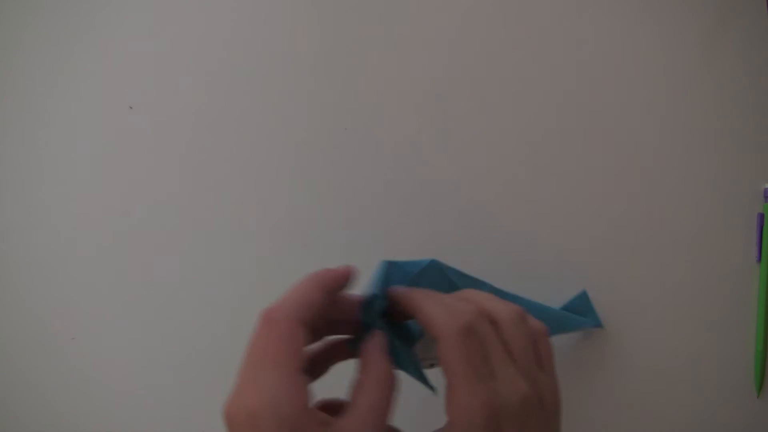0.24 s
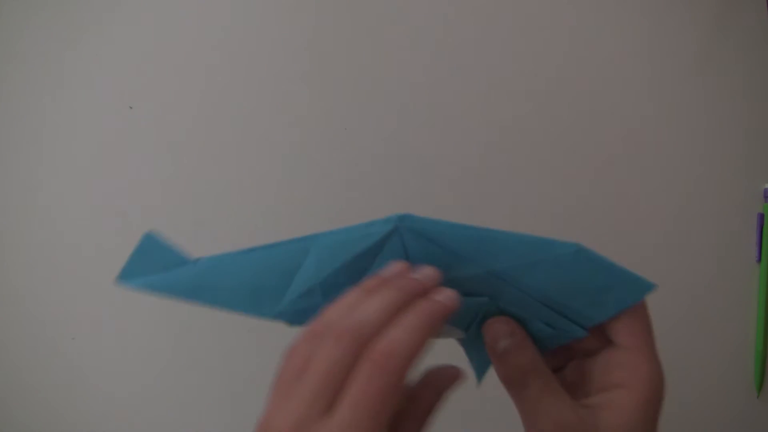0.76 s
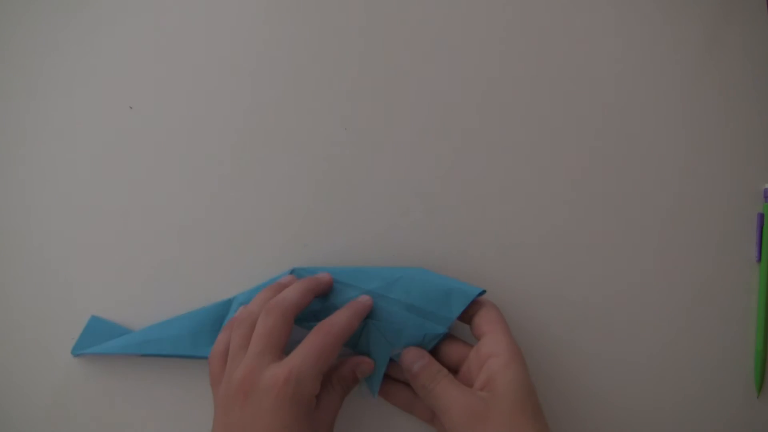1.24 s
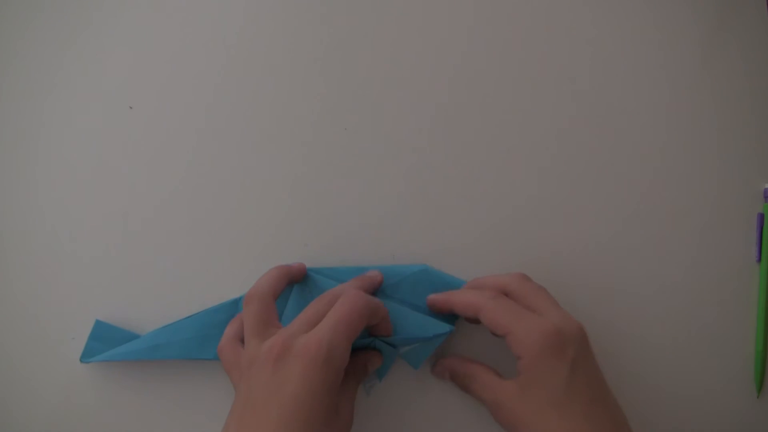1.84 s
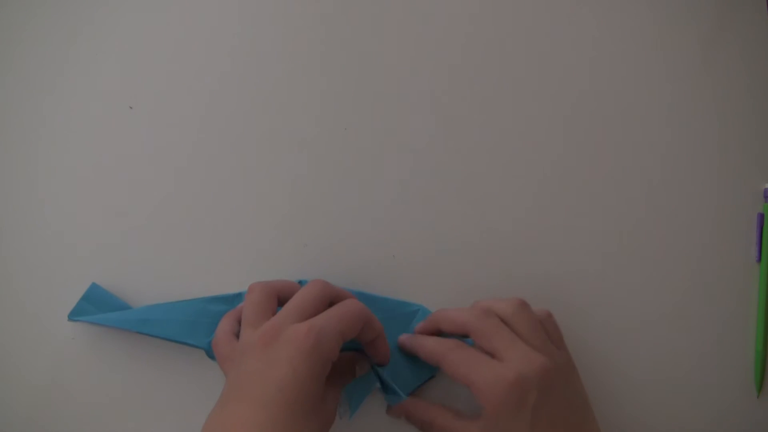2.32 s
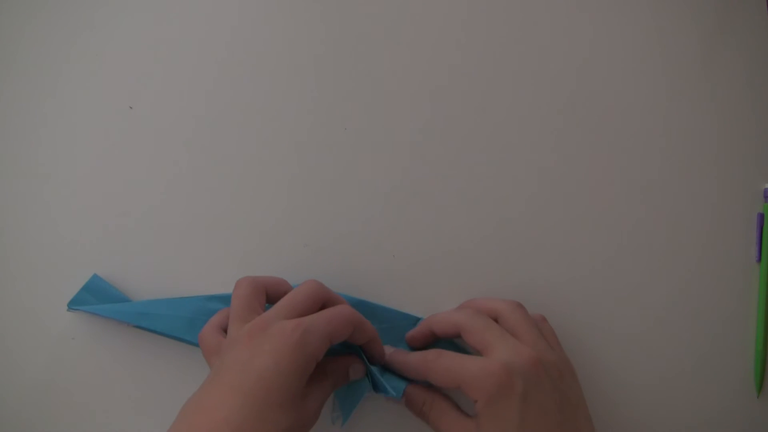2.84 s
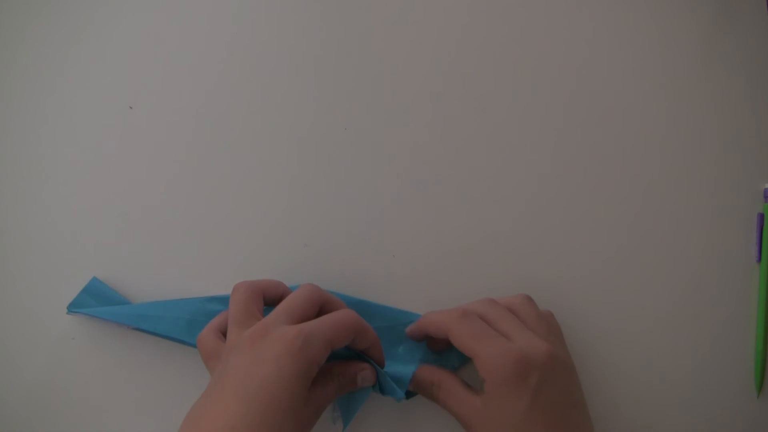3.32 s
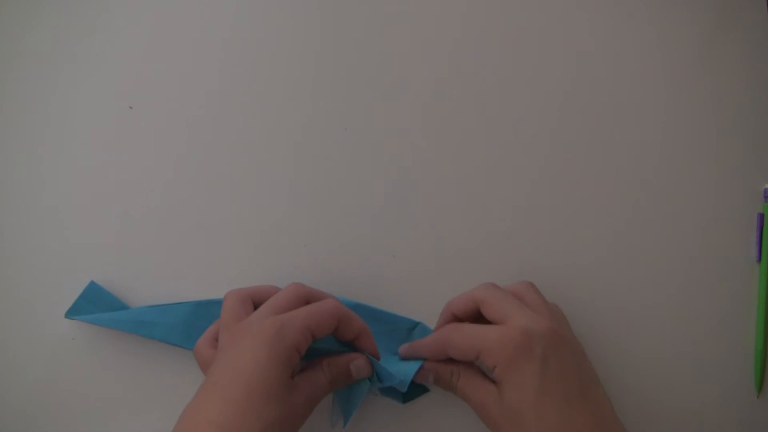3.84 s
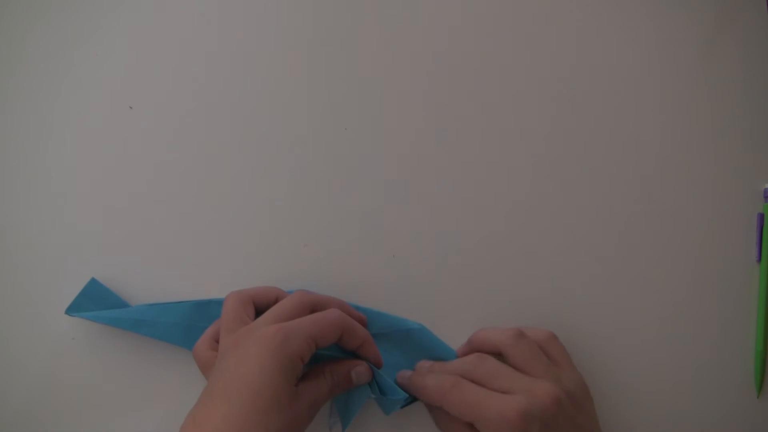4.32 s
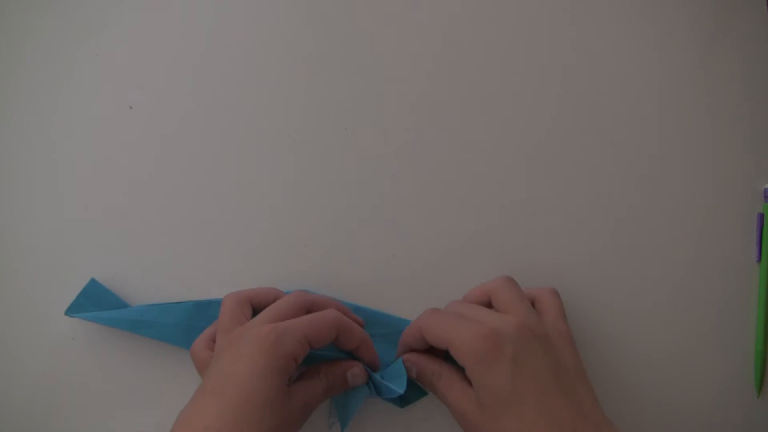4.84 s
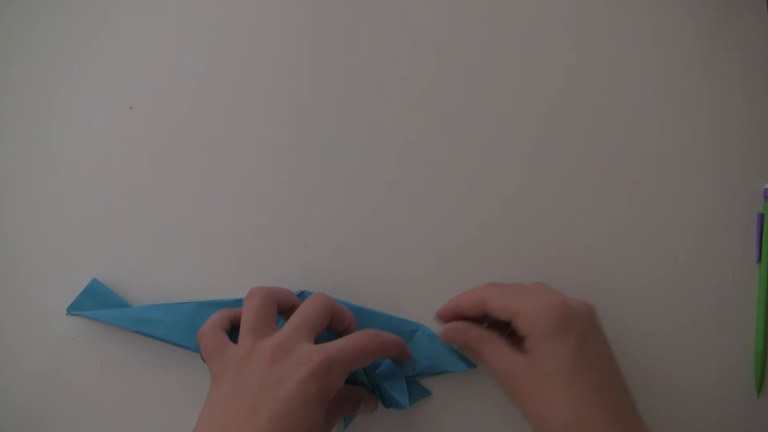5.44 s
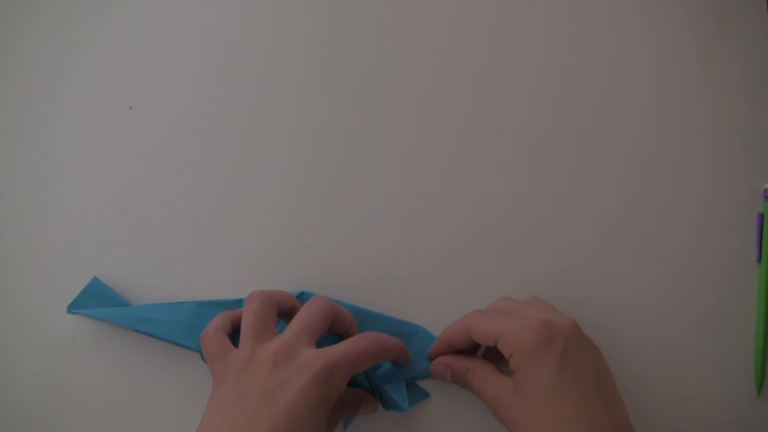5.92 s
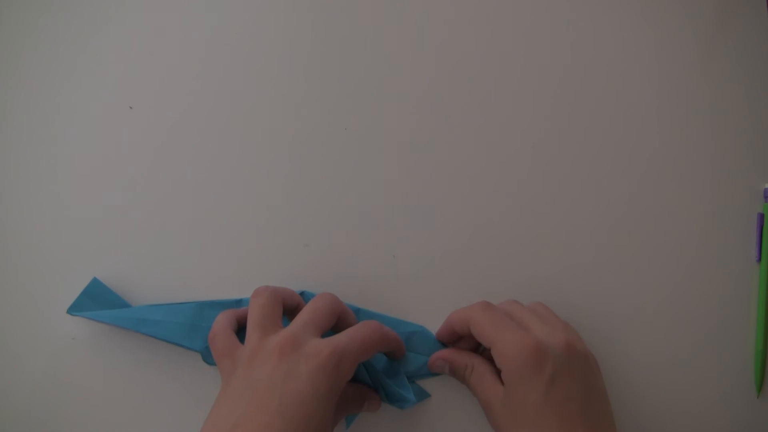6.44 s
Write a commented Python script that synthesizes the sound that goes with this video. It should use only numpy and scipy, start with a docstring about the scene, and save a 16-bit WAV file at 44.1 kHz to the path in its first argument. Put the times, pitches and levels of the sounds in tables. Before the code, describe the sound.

Hands fold stiff paper, making crisp snaps, small crinkles and finger rubbing, with a few soft table bumps.

```python
"""Stiff paper snaps as two hands fold and crease it on a table top.
Each crease buckles in a burst of shocks that briefly rings a facet. Finger friction and tiny
crinkles fill the gaps, a fingernail rasps once, and wrists bump the table into ringing.
A bare room answers over its own low murmur and the hiss of a stereo microphone."""
import sys
import numpy as np
from scipy import signal
from scipy.fft import rfft, irfft
from scipy.io import wavfile
from scipy.ndimage import uniform_filter1d

SR = 44100
rng = np.random.default_rng(int(sys.argv[2]) if len(sys.argv) > 2 else 0)


def store_wav(level_fs):
    """Save 16-bit WAV to argv[1]."""
    pcm = np.round(np.clip(np.atleast_2d(level_fs), -1, 1) * 32767)
    wavfile.write(sys.argv[1], SR, pcm.T.astype(np.int16))


N = 294147

# Buckling creases: (time [s], level [dB], facet pitch [Hz], body [dB re facet], edge [dB re facet])
CREASE_SNAPS = [(0.0215, -42, 2300, -11, -10), (0.0312, -33.5, 1410, -7, 5.5),
                (0.1042, -27.5, 1780, -13.5, 0), (0.1388, -38.5, 1830, -23, 4.5),
                (0.1457, -37.5, 2400, -5, 4), (0.192, -45, 2000, 1, -1), (0.8074, -47.5, 3100, -14, 7.5),
                (0.8992, -34.5, 3530, -12, -6), (1.1, -57, 3000, -5, 11), (1.1376, -46, 3680, 0, 13.5),
                (1.1699, -33, 2010, -4.5, 1.5), (1.2301, -34.5, 2280, -4, -6),
                (1.2504, -26.5, 2340, -13, -1), (1.2574, -18.5, 2640, -13.5, -5),
                (1.2918, -28, 2130, -21, -1), (1.2969, -30, 2860, 0, 3), (1.301, -32, 2560, -9, 4),
                (1.327, -30, 3120, -10, 5.5), (1.3604, -28, 2450, -12, 1), (1.3651, -28.5, 2510, -9, -1),
                (1.5781, -20, 2330, -22, -3.5), (1.654, -44.5, 2430, -20, 2), (1.7812, -37.5, 2560, -3, -8),
                (1.8672, -25.5, 2820, -16, -2.5), (1.8742, -26.5, 2470, -11, -1),
                (1.8895, -29.5, 3140, -7.5, -4), (1.929, -25.5, 2930, -16, 5), (1.9691, -33, 2560, -8, -9),
                (1.992, -29, 2430, -14, -8), (1.9967, -27, 3320, -9.5, -3), (2.1403, -33, 2260, -6.5, 6),
                (2.1849, -33, 3060, -6, 3), (2.1915, -21, 2560, -7, 0.5), (2.3103, -29, 2920, -8, -4),
                (2.3964, -31, 2840, -6.5, -9), (2.4621, -38.5, 2840, -20, -0.5),
                (2.4963, -36, 2600, -14, -2.5), (2.5583, -31, 2580, -11.5, 0),
                (2.6073, -36, 1420, -0.5, -9), (2.7766, -39, 2030, -6, -2.5),
                (2.8312, -38.5, 2670, -16, 0.5), (2.8996, -27, 2340, -0.5, 7.5),
                (2.9112, -20, 3560, -10, 5.5), (2.9148, -36, 3580, 1, 10), (2.9276, -39, 3200, 1, -11),
                (2.981, -40, 2500, -10, 5), (3.0193, -47.5, 1210, 10, 8), (3.0787, -48.5, 1240, 10.5, -9),
                (3.1452, -24.5, 2460, -4, 7.5), (3.1954, -32.5, 3170, -18, -13),
                (3.3021, -31.5, 1290, -14, -7.5), (3.3567, -32, 3260, -9, -3),
                (3.4247, -34.5, 3300, -9, 1.5), (3.5622, -39.5, 2710, -5, -7),
                (3.5972, -34.5, 3060, -6, -5), (3.6404, -27, 2530, -14, -10), (3.7024, -34.5, 3000, -6, 1),
                (3.7747, -29.5, 2840, -10.5, 6), (3.911, -42, 2700, 1, -15),
                (3.9545, -21.5, 2850, -4.5, 2.5), (3.979, -31.5, 3490, -8, 4.5),
                (4.0596, -32, 2020, -0.5, -5.5), (4.1253, -28.5, 3100, -10, -5.5),
                (4.1343, -29.5, 1950, -5.5, -11), (4.2233, -34.5, 2940, -4, -3),
                (4.251, -34.5, 3010, -0.5, -4), (4.293, -46.5, 2650, -6, 12.5),
                (4.375, -53, 3500, -4, 17.5), (4.3989, -31, 3400, -6, -6), (4.5267, -34, 1370, 0, -2),
                (4.6164, -39, 2100, -0.5, -1.5), (4.6778, -26, 2980, -13, -2), (4.7433, -38, 1390, 7, -4),
                (4.8027, -30, 1330, -6, -9.5), (4.8266, -32, 2700, -1.5, -28),
                (4.8949, -32.5, 2140, 0.5, -2.5), (4.9291, -28, 2100, -5.5, -0.5),
                (4.9689, -18.5, 1890, -13.5, -5), (4.9796, -33, 1680, -9, -9),
                (5.0649, -33.5, 3000, -6.5, -8), (5.0923, -28.5, 3450, -11, -1.5),
                (5.1562, -38, 2960, -6, -6), (5.1692, -34, 3420, -2.5, -4), (5.2349, -31.5, 2620, -3.5, -5),
                (5.2428, -27.5, 3240, -13, -1.5), (5.3804, -20, 3040, -19.5, 3.5),
                (5.405, -34, 2930, -6, 0), (5.4227, -41.5, 2060, -8, 9.5), (5.9985, -30.5, 3560, -20, 1.5),
                (6.1595, -31, 3680, -13, -5.5), (6.1777, -33.5, 3700, -15, 2), (6.249, -43, 3340, -6, 4),
                (6.348, -40, 2500, -8, 1), (6.3505, -29.5, 3120, -16, -1), (6.3538, -25, 2240, -7, 3),
                (6.3718, -27.5, 3160, -5.5, 0), (6.3892, -24, 3020, -14, 0.5), (6.5729, -35, 3600, -13, 0)]


def creases():
    """Creases buckle one by one; harder snaps and brighter edges get a crisper top octave."""
    out = np.zeros((2, N))
    for time_s, db, facet_hz, body_db, edge_db in CREASE_SNAPS:
        crisp_db = -0.5 + 1.35 * edge_db + 0.15 * (db + 25.5)
        sound = snap(facet_hz, body_db, edge_db, crisp_db, stretch=1.2)
        add(out, time_s - 1 / 1000, gain_of(db) * sound)  # snap has a 1 ms lead-in
    return out


def snap(facet_hz, body_db, edge_db, crisp_db, stretch):
    """A burst of buckling shocks rings one facet, thuds the sheet and spits treble from the fold."""
    t_ms = np.maximum(np.arange(700) / SR * 1000 - 1, 0)
    rise_ms, decay_ms = 0.049, 1.3 * stretch
    envelope = (1 - np.exp(-t_ms / rise_ms)) * np.exp(-t_ms / decay_ms)
    shocks = rfft(rng.standard_normal((3, 700)) * envelope)
    # abrupt shocks have a broadly flat spectrum
    shared, *own = irfft(shocks / np.sqrt(uniform_filter1d(abs(shocks) ** 2, size=20)))
    width = np.exp(1 / 3.66)
    bands = [(facet_hz / width, facet_hz * width, 0, .25), (700, 1450, body_db, .15),
             (3600, 7500, edge_db, .9), (7500, 16500, crisp_db, 1.8)]
    sound = 0
    for lo_hz, hi_hz, db, spread in bands:
        # shorter waves differ more between the two capsules
        part = band(shared + spread * np.array(own), lo_hz, hi_hz)
        sound = sound + gain_of(db) * part / np.linalg.norm(part.mean(0))
    side_db = 5.5 * rng.uniform(-0.48, 0.31)
    return sound * np.sqrt(SR / 1000) * gain_of([[side_db], [-side_db]])


# Hands pressing the sheet: (time [s], relative level [dB], top-octave lift [dB])
GRIP = [(0, -60.5, -6), (0.17, -58, 14), (0.33, -65.5, 18), (0.66, -67.5, -2), (0.85, -60, -3),
        (1.05, -62.5, 4), (1.36, -46.5, 6), (1.7, -64, 4), (1.9, -53, -4), (2.25, -52, -3), (2.5, -56, 4),
        (2.85, -56.5, -8), (3.1, -53, 10), (3.5, -52.5, 10), (3.85, -50.5, 4), (4.2, -53, 1),
        (4.62, -60, -5), (5.1, -54.5, -5), (5.48, -52, -3), (5.62, -72, -11), (6.0, -66, 2),
        (6.33, -63.5, -13.5), (6.5, -56, -5), (6.67, -64.5, -3)]
# Fingertip scrapes: (peak time [s], length [s], relative level [dB], tilt [dB/oct])
FINGER_SCRAPES = [(0.431, 0.24, -59, 4.5), (0.523, 0.14, -52.5, 2), (0.748, 0.12, -60, 4.5),
                  (1.162, 0.11, -57.5, 1.5), (2.058, 0.11, -48, 1.5), (2.596, .15, -59, .5),
                  (2.871, 0.042, -43.5, 2), (3.31, .2, -51.5, 2.5), (4.298, 0.25, -54, 0.5),
                  (4.403, 0.078, -51.5, 9), (4.7, 0.033, -43.5, 6), (4.768, 0.16, -57.5, -1.5),
                  (5.181, 0.06, -47, -0.5), (5.276, 0.094, -54, 11), (5.78, 0.085, -59, 3),
                  (6.184, 0.11, -52, 0.5)]


def rustle(grip_tilt_db_oct=1.5):
    """The grip and swelling scrapes drive both friction hiss and crinkles."""
    t = np.arange(0, N / SR + .1, 1 / 500)
    grip_s, grip_db, top_db = np.transpose(GRIP)
    power = gain_of(2 * np.interp(t, grip_s, grip_db))
    weighted_tilt = grip_tilt_db_oct * power
    for peak_s, length_s, db, tilt_db_oct in FINGER_SCRAPES:
        swell = gain_of(2 * db) * np.cos(np.pi * np.clip((t - peak_s) / length_s, -.5, .5)) ** 4
        power += swell
        weighted_tilt += tilt_db_oct * swell
    hiss = friction(t, weighted_tilt / power, np.interp(t, grip_s, top_db))
    effort = gain_of(np.interp(np.arange(N) / SR, t, 10 * np.log10(power)))
    return effort * (0.79 * hiss + 0.14 * evened(crinkles()))


# Skin rubbing paper: (frequency [Hz], relative density [dB])
FRICTION_SPECTRUM = [(180, -25), (300, 1), (520, 7), (1230, 0.5), (3400, -3.5), (7200, -6), (11000, -6.5),
                     (16000, -6)]


def friction(t, tilt_db_oct, top_db, patchy_db=2.2, top_hz=12100):
    """Fingers rub out a patchy hiss; its tilt and top lift follow curves over the times t."""
    frame_s = np.arange(N // 64 + 5) * 64 / SR
    hz = np.fft.rfftfreq(256, 1 / SR)[:, None]
    patches = rng.standard_normal((len(frame_s), len(hz))).T
    patches = evened(uniform_filter1d(uniform_filter1d(patches, 8, 0), 20, 1))
    slope_db = np.log2((hz + 200) / 3000) * np.interp(frame_s - .003, t, tilt_db_oct)
    shelf_db = np.interp(frame_s, t, top_db) / (1 + (top_hz / (hz + 1)) ** 6)
    hiss = noise(FRICTION_SPECTRUM, 0.37, size=256, field_db=patchy_db * patches + slope_db + shelf_db)
    return hiss / np.sqrt(np.mean(band(hiss, 2460, 5300) ** 2))


def crinkles(rate_per_s=160, kinds=24):
    """A swarm of tiny buckles, random in time, size and pitch."""
    sizes = gain_of(6.6 * np.minimum(rng.exponential(1, N), 3.5))
    impulses = sizes * (rng.random(N) < rate_per_s / SR)
    kind = rng.integers(0, kinds, N)
    out = np.zeros((2, N))
    for k, (pitch, bright) in enumerate(rng.random((kinds, 2))):
        grain = snap(1300 * 2.8 ** pitch, body_db=2.3, edge_db=14 * bright - 9,
                     crisp_db=12 * bright - 13, stretch=0.61)
        out += signal.oaconvolve((impulses * (kind == k))[None], grain, axes=1)[:, :N]
    return out


def rasp(peak_s=2, length_s=0.03, db=-47.5, facet_hz=3300, width=1.5):
    """A fingernail drags over a taut facet, which hisses at its own pitch."""
    out, count = np.zeros((2, N)), round(length_s * SR)
    hiss = evened(band(rng.standard_normal(count), facet_hz / width, facet_hz * width, order=2))
    add(out, peak_s - length_s / 2, gain_of(db) * (hiss * np.hanning(count))[None])
    return out


# Wrists and knuckles on the table: (time [s], level [dB], hardness [dB/oct])
WRIST_BUMPS = [(0.521, -71, 11), (1.228, -55.5, -2.5), (2.185, -49, 3.5), (2.595, -66, 8.5),
               (2.718, -62, 1), (3.408, -62, 3), (4.064, -57, 7.5), (4.254, -43, -0.5), (4.283, -43, -1),
               (4.36, -51, -2), (4.519, -55.5, 3.5), (4.684, -56, 3), (4.93, -48, -1), (5.079, -54, 3),
               (5.186, -46.5, -4), (5.354, -51, -1), (6.352, -66, 12.5)]
# Table top modes: (frequency [Hz], relative level [dB], t60 [s])
TABLE_MODES = [(122, 2.5, 0.39), (167, 4, 0.21), (253.4, -7.5, 0.2), (320, -3, 0.27), (363.5, -4.5, 0.49),
               (510.4, -5.5, 0.23), (698, -11, 0.2)]


def bumps(rise_s=0.0023):
    """Soft blows ring the table top; harder ones reach its upper modes."""
    out, t = np.zeros((2, N)), np.arange(SR // 2) / SR
    attack = 1 - np.exp(-t / rise_s)
    for time_s, db, hardness in WRIST_BUMPS:
        ring = 0
        for hz, mode_db, t60 in TABLE_MODES:
            envelope_db = mode_db + hardness * np.log2(hz / 120) - 60 * t / t60
            ring += gain_of(envelope_db) * np.sin(2 * np.pi * (hz * t + rng.random()))
        add(out, time_s, gain_of(db) * (ring * attack)[None])
    return out


# Echoes off the table top, then the walls: (delay [ms], left [dB], right [dB])
NEAR_ECHOES = [(.4, -17, -17), (4.1, -13, -14), (8.6, -18, -19)]


def reflections(x):
    """Near surfaces return the sound and soak up some treble."""
    taps = np.zeros((2, 800))
    for delay_ms, *db in NEAR_ECHOES:
        taps[:, round(delay_ms * SR / 1000)] = gain_of(db)
    taps = signal.lfilter([.6], [1, -.4], taps)
    return signal.oaconvolve(x, taps, axes=1)[:, :N]


# Diffuse room response: (frequency [Hz], t60 [s], relative level [dB])
ROOM_DECAY = [(200, 0.057, 3.5), (1290, 0.53, 4.5), (3160, 0.63, 3), (9000, 0.47, 9), (15000, 0.37, 11.5)]


def reverb(x, send_db=-10):
    """Three diffuse tails, fed in turn as the hands move about."""
    room_hz, t60, wet_db = np.transpose(ROOM_DECAY)
    out, half_turns = np.zeros((2, N)), 3.4 * np.arange(N) / SR
    for k in range(3):
        hz, frame_s, spectra = signal.stft(rng.standard_normal((2, SR * 3 // 4)), SR, nperseg=256)
        decay = gain_of(-60 * frame_s / np.interp(hz, room_hz, t60)[:, None])
        tail = signal.istft(spectra * decay, SR, nperseg=256)[1]
        t = np.arange(tail.shape[1]) / SR
        tail *= np.clip(t / 0.0016 - .4, 0, 1)
        tail *= 1 + 0.53 * np.exp(-t / 0.036)  # nearby clutter answers first
        colour = gain_of(np.interp(np.fft.rfftfreq(len(t), 1 / SR), room_hz, wet_db))
        tail = irfft(rfft(tail / np.linalg.norm(tail[0])) * colour)
        feed = x.mean(0) * np.sqrt(2 / 3) * np.cos(np.pi * (half_turns + k / 3))
        out += gain_of(send_db) * signal.fftconvolve(feed[None], tail, axes=1)[:, :N]
    return out


# Noise floor: (frequency [Hz], relative density [dB])
FLOOR_SPECTRUM = [(18, -40), (35, -13), (70, -13.5), (115, -2.5), (240, -3.5), (450, -8), (750, -14),
                  (1300, -18), (5000, -25.5), (16000, -32.5)]


def noise_floor(rms_db=-54):
    """Steady room murmur and microphone hiss."""
    return gain_of(rms_db) * evened(noise(FLOOR_SPECTRUM, 0.3, size=2048))


def noise(spectrum, correlation, size, field_db=0):
    """Partly correlated stereo noise; field_db shapes it over frequency and time."""
    frames, hz = N // (size // 4) + 5, np.fft.rfftfreq(size, 1 / SR)
    a, b, c, d = rng.standard_normal((frames, len(hz), 4)).T
    left = a + 1j * b
    right = correlation * left + np.sqrt(1 - correlation ** 2) * (c + 1j * d)
    spectra = np.array([left, right]) * gain_of(read(spectrum, hz)[:, None] + field_db)
    return signal.istft(spectra, nperseg=size, noverlap=size - size // 4)[1][:, :N]


def gain_of(db):
    """Decibels to amplitude."""
    return 10 ** (np.asarray(db) / 20)


def evened(x):
    """Scales to rms 1."""
    return x / np.sqrt(np.mean(x ** 2) + 1e-20)


def read(points, hz):
    """Table lookup on a log-frequency axis."""
    point_hz, value = np.transpose(points)
    return np.interp(np.log(hz + 1), np.log(point_hz + 1), value)


def add(mix, time_s, sound):
    """Mixes a sound in at time_s."""
    part = mix[:, max(round(time_s * SR), 0):][:, :sound.shape[1]]
    part += sound[:, :part.shape[1]]


def band(x, lo_hz, hi_hz, order=3):
    """Causal band-pass."""
    return signal.sosfilt(signal.butter(order, [lo_hz, hi_hz], "bandpass", fs=SR, output="sos"), x)


def scene():
    """Paper and table in the room."""
    direct = creases() + rustle() + rasp() + bumps()
    return direct + reflections(direct) + reverb(direct)


# Capsules in their housing: (frequency [Hz], gain [dB])
MIC_RESPONSE = [(300, 0), (1300, 1), (2000, -1), (2700, 1), (3900, 0.5), (5200, 0.5), (8000, -1),
                (11500, -7.5), (13000, -11), (16000, -22.5)]
# Capsule imbalance: (frequency [Hz], left minus right [dB])
MIC_BALANCE = [(300, -0.5), (2000, -1), (4500, 1), (8000, 2.5), (13000, -3.5)]


def record(dry, cutoff_hz=16600):
    """Capsule colour, noise floor, then the band limit."""
    hz = np.fft.rfftfreq(N, 1 / SR)
    colour_db = read(MIC_RESPONSE, hz) + np.outer([.5, -.5], read(MIC_BALANCE, hz))
    sound = irfft(rfft(dry) * gain_of(colour_db), N) + noise_floor()
    lowpass = signal.firwin(511, cutoff_hz, window=("kaiser", 9), fs=SR)
    return signal.oaconvolve(sound, lowpass[None], "same")


dry = scene()
out = record(dry)
store_wav(out)
```